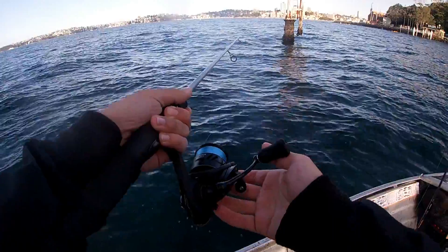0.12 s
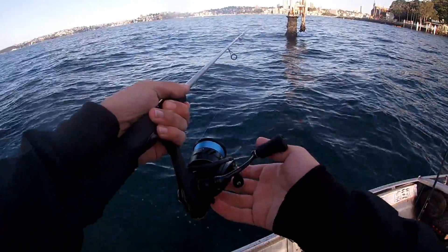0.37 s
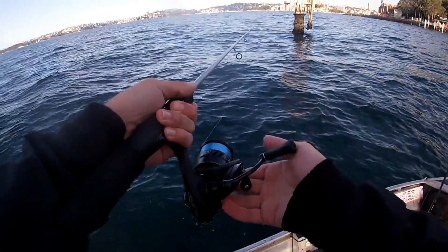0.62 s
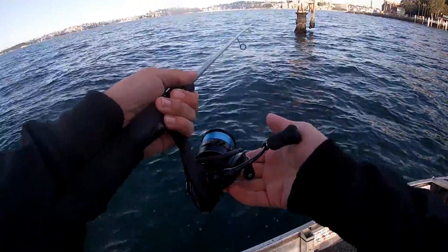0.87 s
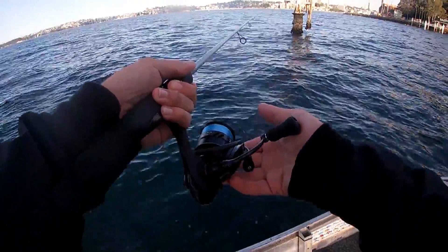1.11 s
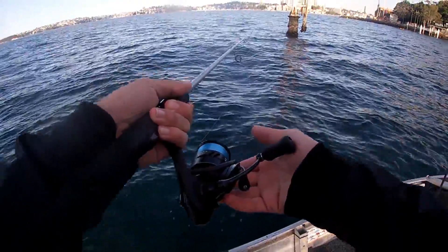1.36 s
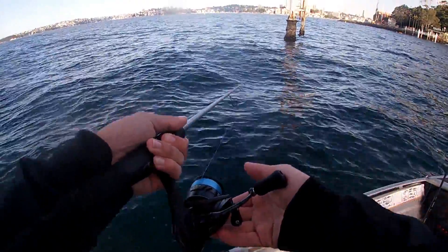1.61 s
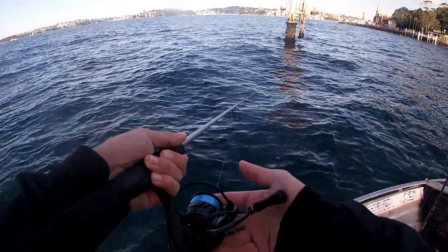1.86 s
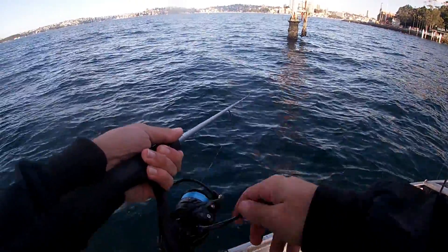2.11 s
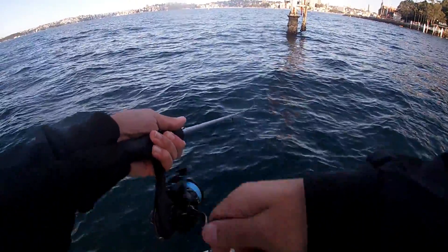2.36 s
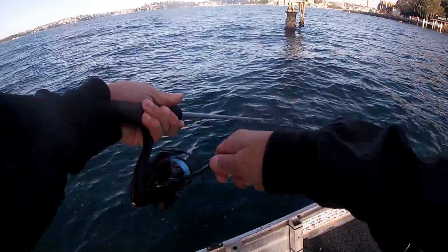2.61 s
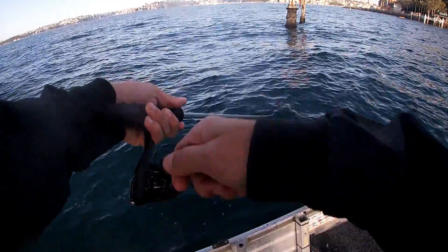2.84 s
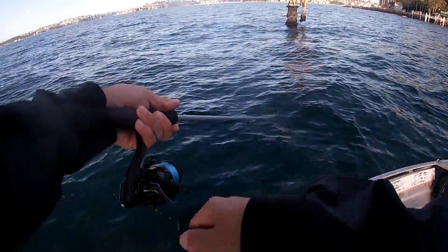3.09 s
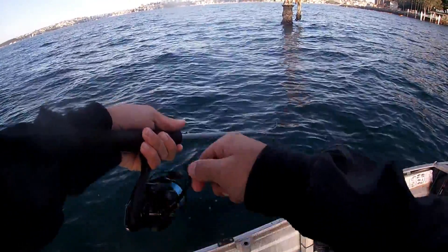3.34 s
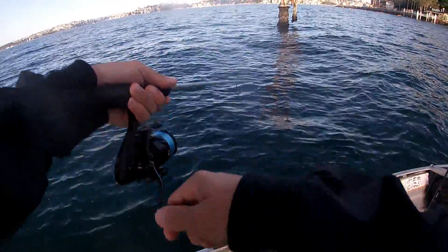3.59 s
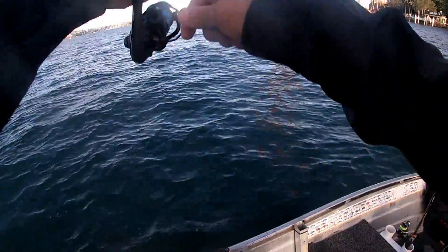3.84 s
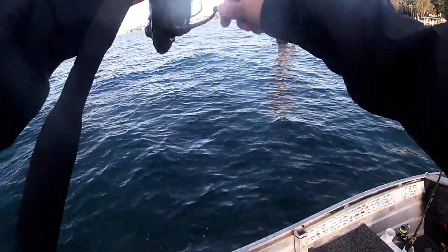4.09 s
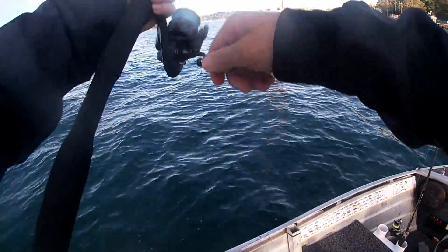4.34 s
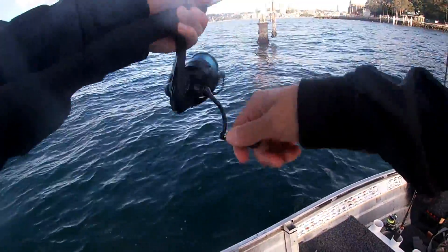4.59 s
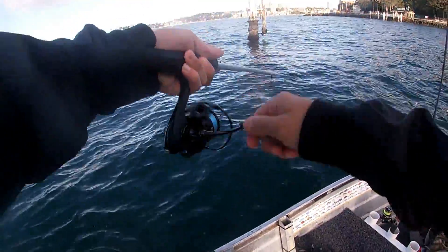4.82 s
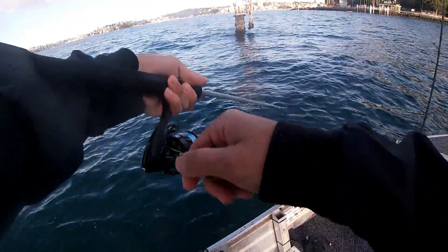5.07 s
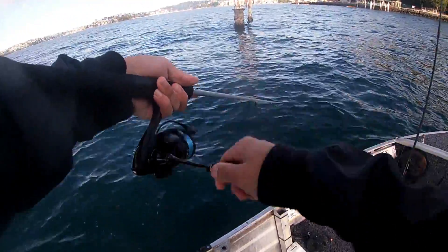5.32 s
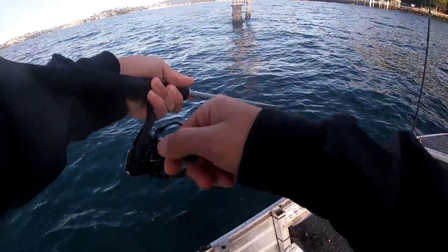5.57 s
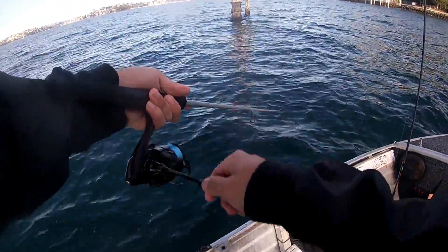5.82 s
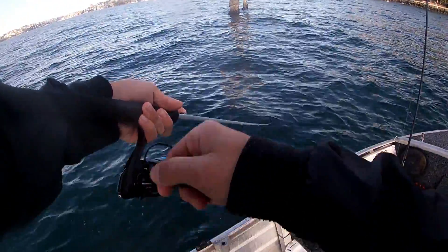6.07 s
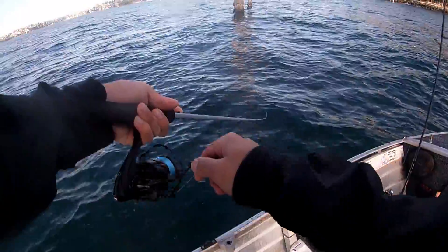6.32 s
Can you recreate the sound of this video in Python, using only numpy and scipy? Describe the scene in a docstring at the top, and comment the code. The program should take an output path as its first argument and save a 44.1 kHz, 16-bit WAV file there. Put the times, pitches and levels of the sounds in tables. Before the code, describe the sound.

A low idling engine hum, mostly deep with faint higher tones, runs throughout, wavering and dipping as the angler turns, over murky water wash and soft wind rumble. From 0 to 1.1 s, faint dry reel ticks and a tiny plink, with light cloth rustle and a handle scrape near 0.9. At 1.2 hollow gulps and a wet slap sound under the hull. At 1.9 the bail snaps shut, a loud, bright metallic clack with a rapid rebound, then a heavy rounded gulp at 2.2. More gulps and slaps come at 2.7 and 3.2-3.35. Ticks gather at 3.65-3.8, and a sharp sleeve swish with a scrape bursts at 3.85. At 4.5-4.9 clicks, slaps and low gulps crowd together with a wind thump. From 5 to 5.5 two more gulps precede small plinks and thin line swishes. A softer gulp and slap follow at 5.8, then sparse ticks, a deep soft thump at 6.2 and a final slap at 6.4 as wind rises.

```python
"""Open water, aboard a metal-hulled boat: an idling engine hums as a sum of steady, wavering sine lines.
Wavelets gulp under the hull as rising damped tones and slap it as ringing noise with a clear note.
An angler's reel ticks, swishes and scrapes as resonated noise, its wire bail snaps shut as decaying
modes, and small loose parts plink. A jacket rustles as filtered hiss and crackles, over a wash of
engine and wave noise and the low buffeting of wind on the microphone."""
import sys
import numpy as np
from scipy import signal
from scipy.fft import rfft, irfft, next_fast_len
from scipy.io import wavfile
from scipy.ndimage import uniform_filter1d, map_coordinates

SR = 44100
rng = np.random.default_rng(int(sys.argv[2]) if len(sys.argv) > 2 else 0)


def level_to_linear(level):
    """Convert decibel levels to linear amplitude factors, elementwise."""
    exponent = np.asarray(level, float) / 20
    return 10 ** exponent


def waveform_to_disk(signal):
    """Save audio, clipped to [-1, 1], as 16-bit WAV at the path in sys.argv[1]."""
    frames = np.transpose(np.atleast_2d(signal))
    scaled = np.clip(frames, -1, 1) * 32767
    samples = np.round(scaled).astype(np.int16)
    wavfile.write(sys.argv[1], SR, samples)


N = 283987


def unit(x):
    """Normalisation: x scaled to rms 1."""
    return x / np.sqrt(np.mean(x ** 2) + 1e-20)


def curve(rows):
    """Linear interpolation: one value per sample from rows of time and value."""
    s, value = np.transpose(rows)
    return np.interp(np.arange(N) / SR, s, value)


def wobble(rate):
    """Slow random modulation: a smooth curve through random knots, rate knots a second (40 at most)."""
    knots = rng.standard_normal(int(N * 40 / SR) + 9)
    return map_coordinates(knots, [np.arange(N) * min(rate, 40) / SR])


def through(x, spectrum):
    """Linear filtering: x through a (Hz, dB) gain curve, interpolated over log frequency."""
    m = next_fast_len(N + 8192)
    hz, db = np.transpose(spectrum)
    gain = level_to_linear(np.interp(np.log(np.fft.rfftfreq(m, 1 / SR) + 1), np.log(hz + 1), db))
    return irfft(rfft(x, m) * gain, m)[..., :N]


def coloured(x, spectrum):
    """Spectral shaping: x filtered and brought to rms 1."""
    return unit(through(x, spectrum))


def resonance(x, hz, width_hz):
    """Simple resonance: x through one peak, brought to peak 1."""
    y = signal.lfilter(*signal.iirpeak(hz, hz / width_hz, SR), x)
    return y / np.abs(y).max()


def steep_resonance(x, hz, width_hz, wider_hz):
    """Cascaded resonance: two peaks at one pitch, for steeper skirts."""
    return resonance(resonance(x, hz, width_hz), hz, wider_hz)


def fade(t, t60, rise):
    """Damped response: quick rise, then exponential decay by 60 dB in t60 (3 ms at least)."""
    return level_to_linear(-60 * t / max(t60, .003)) * (1 - np.exp(-t / rise))


def add(track, s, burst):
    """Superposition: mixes a burst into the track at time s."""
    part = track[round(s * SR):][:len(burst)]
    part += burst[:len(part)]


def crackles(count, low_hz, cycles, spread_db, size):
    """Random impulsive process: damped sines at random times and sizes, pitched over three octaves."""
    s, pitch, strength = rng.random((count, 3)).T
    hz = low_hz * 2 ** (3 * pitch[:, None])
    t = np.arange(size) / SR
    sizes = level_to_linear(spread_db * strength[:, None] ** 3)
    grain = sizes * np.exp(-t * hz / cycles) * np.sin(2 * np.pi * hz * t)
    at = (s[:, None] * N).astype(int) + np.arange(len(t))
    return unit(np.bincount(at.ravel(), grain.ravel(), N)[:N])


def patchy(x, depth_db):
    """Time-frequency modulation: x with patches of random gain in time and pitch."""
    z = signal.stft(x, nperseg=1024)[2]
    field = uniform_filter1d(rng.standard_normal(z.shape), size=8, axis=0)
    field = uniform_filter1d(field, size=7, axis=1)
    return unit(signal.istft(z * level_to_linear(depth_db * unit(field)), nperseg=1024)[1][:N])


# steady engine lines: pitch_hz [Hz], level_db [dB rms before the turning gain], waver_db [dB]
ENGINE_LINES = [(81.34, -32, 1.5), (140.2, -41, 4), (210.3, -51, 2.5), (281, -56, 4), (345.6, -55, 2.5)]
# gain of the hum as the angler turns: time_s [s], gain_db [dB]
TURNING_GAIN = [(0, 1.5), (.5, -0.5), (1, -4), (1.7, -3.5), (2, 1), (3.4, -1.5), (4.1, 3.5), (4.6, -6.5),
                (5.4, 1), (5.9, -6), (6.2, -10), (6.44, -3)]


def engine():
    """Additive synthesis: exhaust and shaft lines waver in level and phase on their way over the water."""
    t = np.arange(N) / SR
    lines = np.zeros(N)
    for hz, db, waver_db in ENGINE_LINES:
        level = level_to_linear(db + waver_db * wobble(3.246))
        phase = 0.11 * wobble(2.02) + rng.uniform(0, 2 * np.pi)
        lines += level * np.sin(2 * np.pi * hz * t + phase)
    return np.sqrt(2) * level_to_linear(curve(TURNING_GAIN)) * lines


# air pockets gulping under the hull: start_s [s], level_db [dB], pitch_hz [Hz at the start]
AIR_POCKETS = [(1.218, -18, 277), (1.243, -16.5, 154), (2.189, -7.5, 165), (2.236, -15, 181),
               (2.26, -14.5, 181), (2.712, -15.5, 255), (2.743, -18, 237), (3.18, -15.5, 315),
               (3.229, -12, 331), (3.263, -19.5, 292), (3.334, -26, 250), (4.387, -30, 296),
               (4.58, -20, 384), (4.71, -15, 91.5), (4.745, -14.5, 61.6), (4.733, -19, 305),
               (4.78, -14, 310), (4.807, -18.5, 317), (4.82, -18.5, 147), (5.07, -13, 250),
               (5.092, -13, 250), (5.119, -18.5, 215), (5.772, -24.5, 191), (5.8, -24, 137),
               (6.214, -17.5, 48.2)]
GULP_CYCLES = 15.2  # cycles of the starting pitch until the ring is 60 dB down
THUMP_T60_S, THUMP_HZ = 0.11, 380  # ring time; pocket pitch with thump at full level, less below it


def gulps():
    """Cavity resonance: a pocket's pitch rises as it closes, over a thump of the plate."""
    out, t = np.zeros(N), np.arange(SR // 4) / SR
    for s, db, hz in AIR_POCKETS:
        glide = t + 1.07 * t ** 2
        tone = np.sin(2 * np.pi * hz * glide) * fade(t, GULP_CYCLES / hz, 0.81 / hz)
        thump = resonance(resonance(rng.standard_normal(len(t)), 220, 290), 160, 290)
        thump = (hz / THUMP_HZ) ** 2 * fade(t, THUMP_T60_S, 0.0041) * thump
        add(out, s, level_to_linear(db) * (0.47 * tone / tone.max() + thump))
    return out


# wavelets slapping the plate, one row per ringing patch:
# start_s [s], level_db [dB], pitch_hz [Hz], t60_s [s, of the splash before its resonance]
PLATE_SLAPS = [(1.204, -34, 1910, 0.16), (1.206, -32.5, 1160, 0.13), (1.235, -25.5, 432, 0.22),
               (1.32, -35, 790, 0.23), (1.50, -41, 753, 0.24), (2.245, -34, 674, 0.16),
               (2.35, -37, 702, 0.33), (2.699, -35, 1470, 0.034), (2.706, -28, 810, 0.067),
               (2.712, -27, 398, 0.25), (2.995, -30, 790, 0.058), (2.999, -32.5, 1310, 0.14),
               (3.02, -38, 1180, 0.23), (3.223, -34, 920, 0.044), (3.224, -44, 1710, 0.066),
               (3.23, -27, 510, 0.1), (3.339, -38, 1020, 0.088), (3.343, -33, 1360, 0.13),
               (3.36, -31, 500, 0.1), (4.045, -34, 581, 0.26), (4.515, -35, 1006, 0.3),
               (4.52, -42, 1570, 0.27), (4.555, -31.5, 496, 0.11), (4.604, -27.5, 720, 0.12),
               (4.78, -28.5, 510, 0.064), (4.778, -42, 850, 0.067), (4.781, -41, 1370, .05),
               (4.853, -35, 1090, 0.091), (4.876, -42, 1120, 0.18), (4.906, -43, 1210, .092),
               (4.935, -30.5, 777, 0.073), (4.96, -41, 900, 0.16), (5.055, -33, 565, 0.16),
               (5.496, -39.5, 825, .09), (5.722, -43, 1150, 0.12), (5.768, -39.5, 1780, 0.11),
               (5.773, -39.5, 1070, 0.13), (5.79, -28, 460, 0.34), (5.782, -42, 1570, .08),
               (5.80, -35.5, 794, .1), (6.421, -33, 544, 0.16)]
SLAP_WIDTH = 0.33  # bandwidth over pitch
PLOP_DB = -4.5  # gain of the clear note


def slaps():
    """Impact excitation: splash noise rings a patch of plate, with a shorter clear note gliding up."""
    out, t = np.zeros(N), np.arange(SR // 4) / SR
    for s, db, hz, t60 in PLATE_SLAPS:
        splash = rng.standard_normal(len(t)) * fade(t, t60, 0.0012)
        splash = steep_resonance(splash, hz, SLAP_WIDTH * hz, 2 * SLAP_WIDTH * hz)
        plop = np.sin(2 * np.pi * hz * (t + 1.3 * t ** 2)) * fade(t, 0.61 * t60, 0.0023)
        add(out, s, level_to_linear(db) * (0.74 * splash + level_to_linear(PLOP_DB) * plop))
    return out


# the bail lifts, snaps home and rebounds: start_s [s], level_db [dB, first contact]
BAIL_BLOWS = [(1.897, -43), (1.9097, -24), (1.9105, -7), (1.9318, -18.5), (1.944, -34)]
# modes of the bail wire: pitch_hz [Hz], level_db [dB, relative], t60_s [s]
BAIL_MODES = [(960, -9.5, .01), (1400, -25, 0.0084), (1800, -4.5, 0.025), (2400, -7, 0.019),
              (3220, -8, .012), (4560, 5, 0.012), (5100, -3, .011), (5440, 0.5, 0.0086), (5850, -9, .013),
              (6700, -5, 0.014), (7180, -1, .013), (7640, -6, 0.0088), (8650, -9, .01),
              (11300, -21, 0.0037), (12740, -8, .006), (14370, -1, .005)]
CHATTER_S, GAP_GROWS = .0014, 1.25  # first gap between contacts; each next gap over the one before
CHATTER_LOSS_DB, BRIGHTENS_DB = 2.7, 2.5  # loss a contact; treble tilt per octave and contact


def bail():
    """Modal synthesis: the wire chatters, ever slower, weaker and brighter, on the same modes."""
    out, t = np.zeros(N), np.arange(SR // 20) / SR
    gaps = CHATTER_S * GAP_GROWS ** np.arange(5)
    for start, first_db in BAIL_BLOWS:
        for k, s in enumerate(start + np.cumsum(gaps) - gaps):
            ring = np.zeros(len(t))
            for hz, level, t60 in BAIL_MODES:
                tilt_db = BRIGHTENS_DB * k * np.log2(min(hz, 7500) / 5000)
                strength = level_to_linear(level + tilt_db + rng.normal(0, 3))  # new at every contact
                ring += strength * fade(t, t60, .0003) * np.sin(2 * np.pi * (hz * t + rng.random()))
            crack = resonance(rng.standard_normal(len(t)) * fade(t, .012, .0003), 5000, 7000)
            add(out, s, level_to_linear(first_db - CHATTER_LOSS_DB * k) * (ring / np.abs(ring).max() + 0.5 * crack))
    return out


# reel and tackle ticks: start_s [s], level_db [dB peak of the body], pitch_hz [Hz],
# treble_db [dB, thin parts over body]
REEL_TICKS = [(0.054, -53.5, 4000, 3), (.074, -56, 4000, 6), (.104, -49, 3480, -1), (.156, -44, 4100, -18),
              (.303, -50, 3300, -15), (.3222, -49, 2400, -13), (0.346, -48, 2970, -4),
              (.392, -54, 6000, -3), (.405, -50, 2970, 0), (0.4287, -47, 3060, -13), (0.501, -47, 3500, -3),
              (.5496, -45.5, 4800, -8), (0.6405, -41, 2300, -13), (1.541, -45, 2110, 5),
              (1.576, -40, 2400, -1), (1.6631, -40, 2100, -2.5), (3.518, -43.5, 2400, -10),
              (4.37, -42, 2700, -10), (5.831, -45, 2700, -0.5), (5.928, -46, 2900, -20),
              (6.253, -43, 3300, -9), (0.1406, -41.5, 4700, -19), (0.237, -34, 2880, -18),
              (0.913, -41, 2100, -2), (.93, -54, 2100, -10), (.953, -47, 2100, -3), (0.963, -47, 1900, -3),
              (1.006, -47, 2000, 0), (1.037, -46, 2300, -2), (1.07, -50, 2000, -5), (1.09, -48, 2090, -3),
              (1.106, -43, 1900, -8), (1.118, -48, 2200, -8), (1.1275, -37, 2080, -8),
              (1.596, -38.5, 3880, -3), (1.9766, -39, 2440, -9), (2.0429, -34.5, 3460, -6),
              (2.059, -41, 4320, -27), (2.129, -36, 4600, -25), (2.172, -38, 2580, -18),
              (2.251, -40, 3500, 0), (2.293, -52, 3980, -16), (2.696, -35, 3000, -14),
              (2.819, -45, 6000, -8), (2.855, -37, 6450, -3), (2.961, -56, 6500, 0),
              (3.2194, -39, 5040, -26), (3.2488, -38.5, 3750, -11), (3.279, -45, 3700, -8),
              (3.349, -51, 5500, -5), (3.6606, -31.5, 4430, -33), (3.681, -35.5, 3620, -23.5),
              (3.717, -41, 2720, -25), (3.746, -51, 4000, -10), (3.787, -38, 2210, -21),
              (3.802, -30, 3300, -22), (3.9423, -34, 3200, -12), (3.9826, -40, 3740, -21),
              (4.154, -41.5, 2980, 1), (4.507, -43.5, 3480, -6), (4.602, -42, 3920, 3),
              (4.612, -33.5, 3200, 4.5), (4.664, -29, 2800, -3), (4.718, -29, 3200, -10.5),
              (4.773, -35.5, 3270, -5), (4.78, -38.5, 3460, -20), (4.9345, -39.5, 3300, -9),
              (5.0583, -36.5, 2900, -14), (5.1253, -39, 3000, -12), (5.135, -45, 2400, -12),
              (5.194, -39, 3130, -4), (5.422, -36, 2830, -18), (5.8134, -41, 5470, -11),
              (5.844, -44, 2240, 3.5), (5.859, -44, 3730, 1), (6.0833, -44, 5830, -14.5),
              (6.166, -42, 7300, -2)]
TICK_T60_S = 0.012  # decay of the blow
CRACK_DB = -0.5  # wide crack of the contact over the body at treble_db 0, weaker in dull ticks


def ticks():
    """Impulse response: a tiny blow rings the reel body low and its thin parts high."""
    out, t = np.zeros(N), np.arange(SR // 8) / SR
    for s, db, hz, treble_db in REEL_TICKS:
        blow = rng.standard_normal((2, len(t))) * fade(t, TICK_T60_S, 0.00047)
        body = steep_resonance(blow[0], hz, .3 * hz, .7 * hz)
        thin = steep_resonance(blow[1], 7500, 1500, 4000)
        crack = steep_resonance(blow[0] * fade(t, .007, .0004), 4500, 3500, 6000)
        crack = level_to_linear(CRACK_DB + 0.38 * treble_db) * crack
        add(out, s, level_to_linear(db) * (body + level_to_linear(treble_db) * thin + crack))
    return out


# thin bright swishes of the line: middle_s [s], level_db [dB], half_length_s [s, middle to 1/e]
LINE_SWISHES = [(0.512, -45, 0.0036), (.845, -43, .005), (1.192, -44, .005), (1.242, -44, 0.0015),
                (1.539, -41, 0.0099), (1.861, -40.5, 0.0097), (2.202, -44, 0.006), (2.216, -43, 0.0052),
                (2.41, -61, 0.013), (2.512, -39.5, 0.0087), (2.695, -44, .003), (2.703, -48, .006),
                (2.781, -50, .002), (2.849, -40, 0.0048), (2.897, -46, .002), (3.208, -41.5, 0.017),
                (3.485, -43.5, .006), (3.861, -33, 0.02), (3.892, -38, 0.008), (4.121, -41, .004),
                (4.196, -46, 0.0018), (4.416, -41, 0.0018), (4.47, -45, 0.0067), (4.821, -41, 0.03),
                (5.036, -44, 0.0044), (5.06, -44, .003), (5.122, -38, 0.013), (5.18, -45, .002),
                (5.195, -37, 0.0018), (5.265, -42, 0.0016), (5.28, -44, 0.0016), (5.317, -44, 0.008),
                (5.386, -42, .002), (5.43, -37, 0.0017), (5.47, -40.5, 0.0091), (5.505, -42, 0.0014),
                (5.808, -41, 0.0095), (6.035, -41, 0.001), (6.111, -47, 0.0015), (6.136, -38.5, 0.0035),
                (6.205, -38, 0.0018), (6.323, -46, 0.0022)]
SWISH_HZ = 9020


def swishes():
    """Band-limited noise: the line hisses briefly under a bell-shaped envelope."""
    out, t = np.zeros(N), np.arange(SR // 8) / SR
    for middle, db, half_s in LINE_SWISHES:
        hiss = rng.standard_normal(len(t)) * np.exp(-((t - t.mean()) / half_s) ** 2)
        main = steep_resonance(hiss, SWISH_HZ, 2300, 3400)
        air = resonance(resonance(hiss, 11000, 5000), 12000, 6000)
        add(out, middle - t.mean(), level_to_linear(db) * (main + 0.28 * air))
    return out


# scrapes of the turning reel handle: start_s [s], length_s [s],
# level_db [dB rms before the swell envelope], pitch_hz [Hz]
HANDLE_SCRAPES = [(.85, 0.34, -52.5, 1500), (0.867, 0.18, -55, 2140), (1.546, 0.23, -59, 2210),
                  (2.696, 0.016, -47, 2930), (2.697, .012, -51, 5870), (2.701, 0.02, -51, 4700),
                  (3.173, 0.022, -56, 3000), (3.216, 0.015, -60, 3000), (3.827, 0.036, -48, 2000),
                  (3.84, 0.027, -57, 5500), (3.853, .025, -44, 3580), (3.864, 0.033, -42, 2520),
                  (4.512, 0.035, -50, 1300), (4.708, 0.036, -51, 2800), (4.771, 0.031, -50, 3480),
                  (5.009, 0.065, -52, 2600), (5.04, 0.055, -52.5, 1580), (5.113, 0.034, -51.5, 2840),
                  (5.153, 0.14, -59, 2660), (5.286, 0.04, -58, 2600), (5.348, 0.043, -57, 2820),
                  (5.712, 0.037, -53, 1190), (5.729, 0.032, -58, 5630), (5.765, 0.042, -58, 1590),
                  (6.197, 0.053, -55.5, 2670)]
SCRAPE_WIDTH = 0.36  # bandwidth over pitch
SLIPS_PER_S, SLIP_DB = 85.5, 3  # rate of the random stutter in knots; its depth


def scrapes():
    """Friction noise: stuttering random force drives a broad resonance as the handle turns."""
    out = np.zeros(N)
    for s, length, db, hz in HANDLE_SCRAPES:
        u = np.arange(round(length * SR))
        slips = map_coordinates(rng.standard_normal(40), [u * SLIPS_PER_S / SR])
        force = rng.standard_normal(len(u)) * level_to_linear(SLIP_DB * slips)
        rasp = steep_resonance(force, hz, SCRAPE_WIDTH * hz, 2 * SCRAPE_WIDTH * hz)
        add(out, s, level_to_linear(db) * unit(rasp) * np.sin(np.pi * u / len(u)) ** 0.61)
    return out


# small loose parts knocked, and at 1.8886 s the click of the bail as it lifts: # start_s [s], level_db [dB],
# pitch_hz [Hz], t60_s [s]
LOOSE_PARTS = [(0.2387, -25, 2420, 0.021), (.8036, -46, 2120, .03), (.8939, -41, 2110, .04),
               (0.9122, -33, 7530, 0.029), (.9128, -36, 5500, 0.021), (1.035, -39, 2270, 0.026),
               (1.389, -51, 4480, 0.016), (1.8886, -42, 3230, .03), (3.349, -33, 3570, 0.022),
               (4.686, -41, 2340, 0.023), (5.0125, -44, 2420, 0.035), (5.03, -48, 2480, .05),
               (5.0579, -43, 4100, 0.033), (5.088, -44, 4280, .04), (4.715, -38, 2700, .03),
               (5.163, -47, 2750, .03), (5.197, -47, 2950, .03), (5.229, -35, 2450, 0.029),
               (5.257, -45, 2600, .03), (5.241, -40, 2730, 0.032), (5.299, -41, 2600, .04),
               (5.315, -44, 2540, 0.044), (5.361, -42, 4020, 0.035), (5.37, -52, 2660, 0.047),
               (5.5004, -40.5, 2710, 0.046), (5.646, -52, 2840, 0.026), (5.98, -52, 2710, 0.036),
               (6.3854, -47, 2500, 0.061)]


def plinks():
    """Single-mode ringing: each knock sounds one short, rough damped note."""
    out, t = np.zeros(N), np.arange(SR // 10) / SR
    for s, db, hz, t60 in LOOSE_PARTS:
        rough = 1 + .5 * unit(uniform_filter1d(rng.standard_normal(len(t)), size=40))
        add(out, s, level_to_linear(db) * rough * fade(t, t60, 0.0012) * np.sin(2 * np.pi * hz * t))
    return out


# sleeve strokes: peak_s [s], level_db [dB rms of the body at the peak],
# swell_s [s to swell by 10 dB, values under 0.012 act as 0.012], treble_db [dB, treble over body]
SLEEVE_STROKES = [(.11, -57.5, -0.14, 1), (0.228, -52, 0.13, -2), (0.568, -56, 0.05, 4),
                  (.93, -59.5, 0.1, 3.5), (1.08, -62, 0.15, 3), (1.61, -51.5, 0.07, -1),
                  (1.9, -53.5, 0.05, -2), (2.1, -52.5, 0.19, -4), (2.29, -49.5, 0.08, -5),
                  (2.408, -51.5, 0.08, 1.5), (2.52, -52, 0.05, -0.5), (2.7, -52, 0.07, -1.5),
                  (2.86, -59.5, 0.16, 1.5), (3.045, -53, 0.06, -0.5), (3.23, -60, 0.43, -1),
                  (3.69, -56.5, 0.04, -8), (3.75, -58, 0.13, 2.5), (3.854, -37, 0.0159, 4),
                  (3.885, -38.5, 0, -6), (3.97, -53, 0.27, -1), (4.15, -49.5, -0.14, -7),
                  (4.3, -60.5, 0.13, 4.5), (4.53, -66, 0, -3), (4.71, -55, 0.27, -0.5),
                  (4.81, -50, -0.08, -3.5), (5.04, -55, 0.1, -1), (5.2, -52, 0.1, -4.5), (5.32, -54, 0, 3),
                  (5.45, -58, -0.56, 1), (5.79, -53.5, 0.02, 0.5), (6.1, -61.5, 1.9, 0)]
# spectra of the cloth's body and treble: pitch_hz [Hz], density_db [dB per Hz, relative]
CLOTH_BODY = [(600, -27.5), (1000, 0.5), (1500, -3.5), (2500, -1), (3500, -0.5), (5000, -13.5), (7000, -30),
              (12000, -67.5)]
CLOTH_TREBLE = [(2500, -50.5), (4000, -6), (5500, 0.5), (7500, 0.5), (8800, 0), (10000, -4.5),
                (12000, -10.5), (16000, -5.5)]
FADE_OVER_SWELL = 1.45  # a stroke dies away more slowly than it swells
REST_DB, REST_TREBLE_DB = -65.5, -68.5  # the jacket at rest, dB rms


def jacket():
    """Friction noise: rubbing fabric gives hiss and small crackles; stroke powers swell, fade and add."""
    t = np.arange(N) / SR
    body_power, treble_power = level_to_linear(REST_DB) ** 2, level_to_linear(REST_TREBLE_DB) ** 2
    for s, db, swell_s, treble_db in SLEEVE_STROKES:
        distance = np.maximum(s - t, (t - s) / FADE_OVER_SWELL)
        power = level_to_linear(db - 10 * distance / max(swell_s, .012)) ** 2
        body_power = body_power + power
        treble_power = treble_power + power * level_to_linear(treble_db) ** 2
    coarse = crackles(count=2000, low_hz=1500, cycles=1.95, spread_db=8, size=400)
    rub = level_to_linear(1.05 * wobble(30)) * (rng.standard_normal(N) + 0.29 * coarse)
    fine = rub + 0.44 * crackles(count=900, low_hz=2500, cycles=2.5, spread_db=11.5, size=200)
    body = np.sqrt(body_power) * coloured(rub, CLOTH_BODY)
    return body + np.sqrt(treble_power) * coloured(fine, CLOTH_TREBLE)


# wash level as the boat rocks: time_s [s], level_db [dB rms]
WASH_LEVEL = [(0, -37), (1.0, -37), (1.4, -36), (2.2, -35.5), (3.3, -36), (3.9, -39), (4.65, -36),
              (5.5, -37.5), (6.44, -39)]
# spectrum of the wash: pitch_hz [Hz], density_db [dB per Hz, relative]
WASH_SPECTRUM = [(53, -32.5), (90, -17.5), (146, -6), (225, -13), (286, -13), (399, -17.5), (471, -19),
                 (998, -34.5), (2500, -45), (3250, -76), (5500, -120)]


def wash():
    """Turbulent noise: patchy engine and wave wash, with small bubbles lapping as damped sines."""
    bubbles = crackles(count=500, low_hz=250, cycles=5, spread_db=8, size=3000)
    noise = patchy(rng.standard_normal(N), depth_db=1.54) * level_to_linear(1.2 * wobble(13))
    return level_to_linear(curve(WASH_LEVEL)) * coloured(noise + 0.082 * bubbles, WASH_SPECTRUM)


# the breeze on the microphone: time_s [s], level_db [dB rms]
BREEZE_LEVEL = [(0, -31), (.7, -30.5), (1.6, -31.5), (1.79, -35), (1.9, -33), (2.4, -37), (3.2, -31),
                (3.7, -30.5), (4.1, -29.5), (4.3, -31.5), (4.72, -27), (5.0, -30.5), (5.7, -38.5),
                (6.1, -30.5), (6.23, -31), (6.32, -39), (6.44, -25.5)]
# spectrum of the buffeting: pitch_hz [Hz], density_db [dB per Hz, relative]
BUFFET_SPECTRUM = [(11, -37), (18, -0.5), (75, 3), (92, -2.5), (107, -2), (130, -3.5), (170, -39.5),
                   (290, -120)]
GUST_DB = 1.5  # depth of the random lumps


def wind():
    """Turbulent pressure: the breeze buffets the microphone with lumpy low noise."""
    lumps = rng.standard_normal(N) * level_to_linear(GUST_DB * wobble(7.5))
    return level_to_linear(curve(BREEZE_LEVEL)) * coloured(lumps, BUFFET_SPECTRUM)


def scene():
    """Superposition: the sum of all sources as heard from the angler's chest, on one channel."""
    water = gulps() + slaps() + wash()
    tackle = bail() + ticks() + swishes() + scrapes() + plinks()
    return (engine() + water + tackle + jacket() + wind())[None]


def top_cut(x):
    """Nothing passes above the cut-off."""
    return signal.sosfilt(signal.butter(12, 15700, fs=SR, output="sos"), x)


# the microphone's treble roll-off: pitch_hz [Hz], gain_db [dB]
MIC_RESPONSE = [(7600, 0), (8600, -7), (9500, -11), (11000, -13.5), (13000, -16.5), (15500, -39)]


def record(dry):
    """Transducer response: a small camera's microphone, dull in the top octave, filters the mix."""
    heard = through(dry, MIC_RESPONSE)
    return top_cut(heard)


dry = scene()
out = record(dry)
waveform_to_disk(out)
```